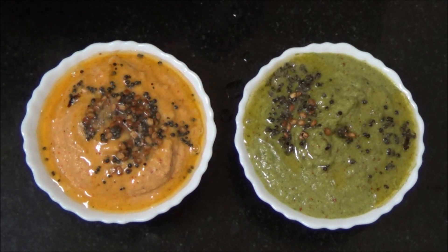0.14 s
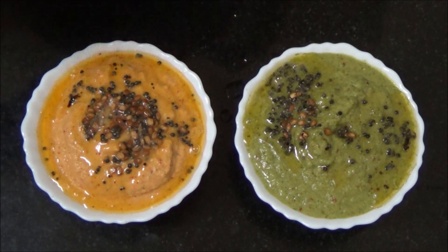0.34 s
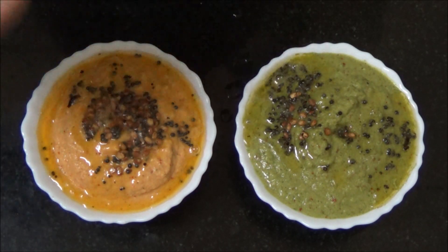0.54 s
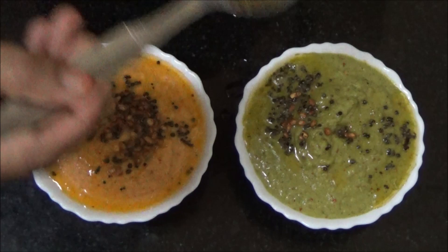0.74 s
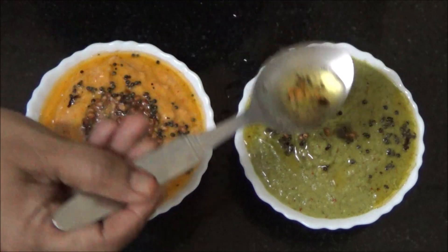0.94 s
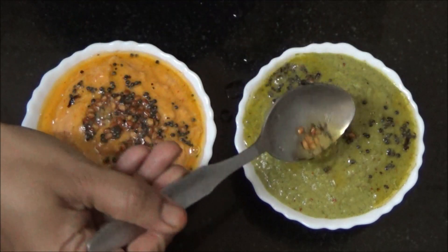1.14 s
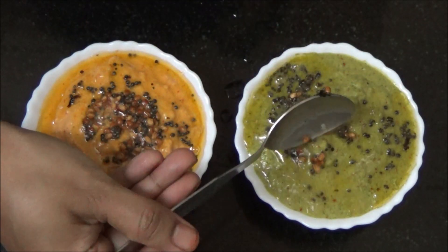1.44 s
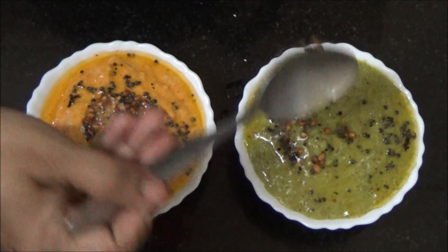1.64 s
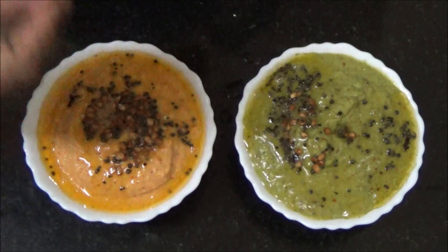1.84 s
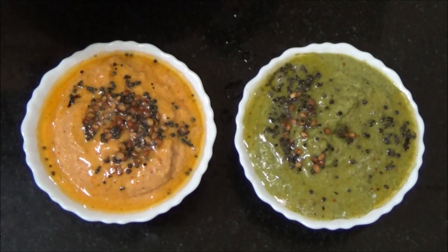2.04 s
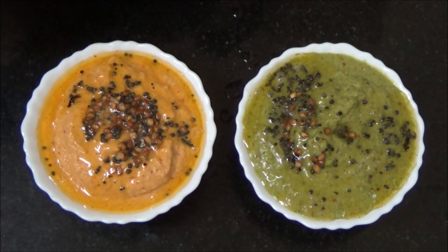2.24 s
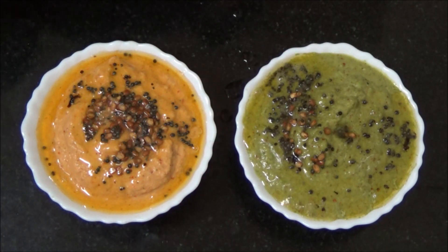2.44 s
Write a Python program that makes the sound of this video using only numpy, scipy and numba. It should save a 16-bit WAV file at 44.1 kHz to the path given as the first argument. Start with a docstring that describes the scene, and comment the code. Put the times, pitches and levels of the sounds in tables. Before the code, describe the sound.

Close up in a home kitchen, crisp high crackling of hot oil dies down, surges abruptly as more is poured, then thins to scattered spits and pops, with a faint scrape and knock at the end over low room hum.

```python
"""Hot oil with fried seeds crackles on wet food in two bowls, a camera just above the counter.
From the start, swarms of tiny damped sines sizzle over a shaped-noise kitchen hum, and steam bubbles
burst as ringing pops with a snap and a fizz; faint far sines waver behind. The sizzle thins, then a fresh
spoonful makes it swell near 1.3 s and thin out again. Late on come spitting runs of like-pitched grains,
a scrape of band-passed noise and dull knocks of decaying modes as something is set down."""
import sys
import numpy as np
from scipy import signal
from scipy.fft import rfft, irfft
from scipy.io import wavfile
from scipy.ndimage import uniform_filter1d, minimum_filter1d
from numba import njit

SR = 44100
rng = np.random.default_rng(int(sys.argv[2]) if len(sys.argv) > 2 else 0)


def wrap_up_sound(samples):
    """Save the sound to the file named by the first command line argument, as 16-bit audio."""
    columns = np.atleast_2d(samples).T
    # keep every value between -1 and 1, then stretch to whole-number steps
    tamed = np.clip(columns, -1, 1)
    steps = np.round(tamed * 32767).astype(np.int16)
    wavfile.write(sys.argv[1], SR, steps)


def gain_from_db(level_db):
    """Convert decibel levels to linear amplitude factors (20 dB per decade)."""
    decades = np.asarray(level_db, float) / 20
    return 10 ** decades


N = 114660


def curve(rows, col=1):
    """Linear interpolation of a table column over time."""
    rows = np.array(rows, float)
    return np.interp(np.arange(N) / SR, rows[:, 0], rows[:, col])


def at_hz(points, hz):
    """Spectral envelope in dB, interpolated on a logarithmic frequency axis."""
    points = np.array(points, float)
    return np.interp(np.log(np.maximum(hz, 1)), np.log(points[:, 0]), points[:, 1])


def unit(x):
    """Normalisation to rms 1."""
    return x / np.sqrt(np.mean(x ** 2))


def causal(points, size=1024):
    """Minimum-phase response of a spectrum by cepstral folding, peak 1."""
    cepstrum = irfft(at_hz(points, np.fft.rfftfreq(size, 1 / SR)) * np.log(10) / 20)
    cepstrum[1:size // 2] *= 2
    cepstrum[size // 2 + 1:] = 0
    response = irfft(np.exp(rfft(cepstrum)))
    return response / np.abs(response).max()


def conv(x, h):
    """Linear convolution along time."""
    return signal.fftconvolve(x, np.atleast_2d(h), axes=1)[:, :N]


@njit
def grains(start, hz, cycles, left, right, attack):
    """Damped oscillation: each grain is a sine that swells quickly and decays exponentially."""
    out = np.zeros((2, N))
    for k in range(len(start)):
        i = int(start[k])
        turn = np.exp((2j * np.pi - 1 / cycles[k] * np.pi) * hz[k] / SR)
        rise = np.exp(-np.pi * hz[k] / SR / min(attack, cycles[k]))
        # begin between samples
        ring, unrisen = turn ** (i + 1 - start[k]), rise ** (i + 1 - start[k])
        while abs(ring) > 2e-3 and 0 <= i < N - 1:
            i += 1
            out[0, i] += left[k] * ring.real * (1 - unrisen)
            out[1, i] += right[k] * ring.real * (1 - unrisen)
            ring *= turn
            unrisen *= rise
    return out


PAN_DB, PAN_SPREAD_DB = -0.5, 1.2  # left over right
ATTACK_CYCLES = 0.99


def place(s, hz, cycles, size, pan_db):
    """Interaural level difference: grains at times s, louder on one side."""
    columns = np.stack(np.broadcast_arrays(s, hz, cycles, size, pan_db))
    s, hz, cycles, size, pan_db = columns.reshape(5, -1)
    left, right = size * gain_from_db(pan_db / 2), size * gain_from_db(-pan_db / 2)
    return grains(s * SR, np.clip(hz, 200, .42 * SR), cycles, left, right, ATTACK_CYCLES)


# small crackle over time: time_s [s], level_db [dB, before GRAIN_DB], pitch_hz [Hz, typical bubble]
SIZZLE = [(0, -28.5, 7700), (.3, -32.5, 7600), (.62, -37.5, 7750), (.9, -39, 8400), (1.08, -38.5, 8500),
          (1.2, -41, 7640), (1.27, -21.5, 7400), (1.34, -18, 7460), (1.41, -16.5, 7000), (1.48, -22, 8300),
          (1.55, -22, 8300), (1.64, -22, 7000), (1.73, -25, 7900), (1.86, -28, 8100), (2.0, -28.5, 7340),
          (2.1, -30.5, 8150), (2.25, -30, 7340), (2.42, -32, 7400), (2.6, -31.5, 7800)]
GRAIN_DB, BOIL_DB, GRAIN_SPREAD_DB = -3, 2.07, 3
GRAIN_OCT, BOIL_OCT, GRAIN_CYCLES = 0.51, 0.11, 2.2


def crackle(count=18000):
    """Superposition of random bubble rings, many small and few large, with uneven level and pitch."""
    when, rank = rng.random((count, 2)).T
    pitch_chance, pan_chance, size_chance = rng.standard_normal((count, 3)).T
    i = (when * (N - 1)).astype(int)
    boil = uniform_filter1d(rng.standard_normal(N), size=300)
    boil = unit(uniform_filter1d(boil, size=300))
    size_db = BOIL_DB * boil[i] - GRAIN_SPREAD_DB * np.log(np.maximum(rank, .012))
    size = np.sign(size_chance) * gain_from_db(size_db)
    # the boil read backwards also sways the pitch
    octaves = GRAIN_OCT * pitch_chance + BOIL_OCT * boil[N - 1 - i]
    hz = curve(SIZZLE, 2)[i] * 2 ** octaves
    return place(when * N / SR, hz, GRAIN_CYCLES, size, PAN_DB + PAN_SPREAD_DB * pan_chance)


# hum spectrum: frequency_hz [Hz], density_db [dB per Hz, relative]
HUM = [(20, -36), (40, -23), (62, -11), (85, -21), (155, -9), (210, -12.5), (270, -8.5), (520, -4),
       (1140, -5), (3200, -8), (6000, -25.5), (16000, -28.5)]
# hum level at 300-1500 Hz: time_s [s], level_db [dB, before HUM_DB]
HUM_LEVEL = [(0, -48), (.85, -53.5), (1.4, -51), (1.85, -53), (2.6, -52)]
# stereo width of the hum: frequency_hz [Hz], side_db [dB, weight of the side noise]
HUM_SIDE = [(60, -21), (200, -20), (700, -9), (1300, -5), (4000, -28.5)]
HUM_DB = 1.5


def hum():
    """Spectral shaping of noise: kitchen, street and microphone hiss, nearly alike left and right."""
    hz = np.fft.rfftfreq(N, 1 / SR)
    mid, side = rfft(rng.standard_normal((2, N))) * gain_from_db(at_hz(HUM, hz))
    band = (hz > 300) & (hz < 1500)
    gain = gain_from_db(curve(HUM_LEVEL) + HUM_DB) / np.std(irfft(mid * band, N))
    side = side * gain_from_db(at_hz(HUM_SIDE, hz))
    return gain * irfft(mid + side * np.array([[1], [-1]]), N)


# loud pops: time_s [s, sound starts POP_LEAD_S earlier], level_db [dB, before POP_DB],
# pitch_hz [Hz, bubble ring], snap_db [dB relative to the ring, before SNAP_DB]
POPS = [(0.023, -9, 11400, -20.0), (0.0296, -12, 9700, -36), (0.0332, -10.5, 9500, -30),
        (0.0429, -14, 8200, -11), (0.0744, -17, 5700, -11.0), (0.0843, -11, 9000, -15),
        (0.1018, -18, 4730, -9), (0.1373, -20, 5600, 3.5), (0.1405, -17.5, 8600, 3.5),
        (0.144, -10.5, 8400, -7), (0.159, -9.5, 7100, -10), (0.1628, -12, 8700, -14),
        (0.1873, -14, 7700, -8.5), (0.207, -10, 9600, -22), (0.2237, -6, 7150, -13.5),
        (0.2365, -11.5, 8800, -5.5), (0.246, -9, 9200, -13), (0.307, -16.5, 9400, -7),
        (0.337, -24, 9400, -24), (0.3497, -15.5, 4400, -4.5), (0.3552, -18, 7500, -4),
        (0.3563, -3.5, 6700, -32), (0.3884, -1.5, 8700, -36), (0.3959, -10, 10400, -24),
        (0.399, -15.5, 8000, -14), (0.4193, -25, 4770, 8), (0.4375, -19, 7700, -21.0),
        (0.4582, -18, 4800, -3.5), (0.4634, -14, 8500, -17.0), (0.4764, -7.5, 11000, -33),
        (0.4837, -3, 10300, -32), (0.5073, -18, 9400, -27.0), (0.5157, -3, 7950, -36),
        (0.5309, -16.0, 10600, -25.0), (0.5608, -3.0, 8800, -13), (0.5644, -15.5, 7600, -5),
        (0.5784, -4.5, 12600, -36), (0.6104, -18, 7640, -5), (0.6435, -15.0, 4700, -11.0),
        (0.6563, -5.5, 6950, -35), (0.6648, -12.5, 6600, -6), (0.6886, -10, 7240, -3.5),
        (0.7348, -19, 7540, -8), (0.7387, -7.5, 7240, -10.5), (0.763, -9.5, 8360, -23),
        (0.8178, -6, 6400, -30), (0.8232, -10, 8600, -14), (0.8513, -18, 9700, -30),
        (0.8734, -24, 7460, -21), (0.8845, -11, 7200, -20.5), (0.9317, -13.0, 6300, -11),
        (0.9436, -4, 9400, -15), (0.9764, -18.0, 8300, -4), (0.9829, -8.5, 6760, -28),
        (1.0103, -10, 6000, -25), (1.0233, -9.5, 4700, -28), (1.0964, -11, 4640, -26),
        (1.1025, -10, 10800, -22), (1.1365, -10.5, 10600, -30), (1.1657, -17.5, 6740, -8.5),
        (1.202, -23.5, 4900, -4), (1.2221, -18.5, 6700, -1), (1.2445, -24, 5600, 5),
        (1.2684, 1.5, 9800, -17.0), (1.2983, -2.5, 6600, -16), (1.309, 1, 8350, -25),
        (1.3446, -2, 7300, -14), (1.3493, -2.5, 7940, -24), (1.393, 0, 7950, -8), (1.4057, 2, 5300, -19),
        (1.4272, -2, 8200, -16), (1.4512, -17, 9200, -24), (1.4675, 5, 10200, -30),
        (1.4758, -10, 8700, -9.5), (1.4828, 3, 9000, -24), (1.5058, 3, 9500, -15),
        (1.5129, -11, 6300, -6.5), (1.5331, -2.5, 9900, -33), (1.578, -3, 10200, -29),
        (1.5821, 4, 10000, -36), (1.6018, -10, 9300, -10), (1.6062, -4.5, 6040, -17),
        (1.6141, 0, 9900, -26), (1.629, -4.0, 5700, -14), (1.635, 7, 7900, -32), (1.6398, -9, 8400, -23.0),
        (1.6417, -13, 7500, -26), (1.653, 2, 6600, -35), (1.6612, -5, 6960, -28), (1.7066, -8, 8900, -35),
        (1.7144, -1, 6300, -16), (1.7405, -7, 7660, -25), (1.7463, -3, 8500, -32), (1.75, 3, 9200, -37),
        (1.7626, -11, 9900, -36), (1.777, -3, 9600, -31), (1.8002, -6, 9200, -33),
        (1.8114, -7.0, 6960, -32), (1.8267, -4, 10300, -15), (1.8448, -6.5, 6160, -23),
        (1.8775, -15, 7000, -26.0), (1.8827, -1.5, 8600, -31), (1.9381, -7.5, 8650, -13),
        (1.9488, -4, 7600, -16), (1.9802, -2.0, 6800, -27.0), (2.003, -7.5, 8400, -26),
        (2.02, -7.5, 7900, -22.0), (2.0312, -16, 7300, -29), (2.052, -11.5, 8400, -7),
        (2.0665, -9, 9000, -8.5), (2.0777, 3, 6400, -24), (2.0903, -8, 9400, -45), (2.097, -2, 8500, -28),
        (2.1249, -13, 7600, -19), (2.1316, -5, 8000, -29), (2.141, -7.5, 8300, -24),
        (2.1607, -2.5, 9000, -16), (2.1744, 5.5, 7660, -23), (2.2164, -2.5, 7100, -32),
        (2.2315, -3, 6850, -30), (2.265, -12.5, 7700, -11), (2.3219, -3.5, 7400, -23.0),
        (2.3493, -13.5, 7050, -10), (2.387, -11.0, 10900, -30), (2.3986, -4.5, 6800, -10),
        (2.4546, -13, 7700, -29), (2.4706, -10, 5700, -18), (2.4796, -8.0, 8400, -13),
        (2.4872, 5, 8300, -48), (2.5297, -10.5, 7100, -14), (2.5557, -8, 8600, -28),
        (2.5955, -10.5, 9200, -38)]
POP_DB, POP_LEAD_S, POP_CYCLES = -2.5, .0003, 3.1
SNAP_DB, SNAP_CYCLES, SNAP_HZ = 25.5, 0.54, 3740
FIZZ_DB, FIZZ_T60_S, FIZZ_OCT, FIZZ_CYCLES = -12, 0.025, 0.32, 4
FIZZ_GAP_S = .006  # scales a squared exponential draw


def pops(count=36):
    """Bubble resonance: a short ring and a broad snap per burst, then a decaying fizz of droplets."""
    s, db, hz, snap_db = np.array(POPS, float).T
    s, size = s - POP_LEAD_S, gain_from_db(db + POP_DB)
    pan_db = PAN_DB + PAN_SPREAD_DB * rng.standard_normal(len(s))
    ring = place(s, hz, POP_CYCLES, size, pan_db)
    snap = place(s, SNAP_HZ, SNAP_CYCLES, size * gain_from_db(snap_db + SNAP_DB), pan_db)
    after = FIZZ_GAP_S * rng.exponential(1, (count, len(s))) ** 2
    size_chance, pitch_chance = rng.standard_normal((2, count, len(s)))
    drops = size * size_chance * gain_from_db(FIZZ_DB - 60 * after / FIZZ_T60_S)
    fizz = place(s + after, hz * 2 ** (FIZZ_OCT * pitch_chance), FIZZ_CYCLES, drops, pan_db)
    return ring + snap + fizz


# faint far tones: start_s [s], length_s [s], from_hz [Hz], to_hz [Hz], level_db [dB, mean amplitude]
TONES = [(.15, .58, 1285, 1400, -57), (.8, .42, 515, 540, -60), (1.48, .3, 480, 478, -57)]
TONE_WIDTH_HZ = 30  # sets the averaging time of the waver


def tones():
    """Amplitude and phase modulation: thin gliding sines from far outside, wavering at random."""
    t, out = np.arange(N) / SR, 0
    for s, length, hz0, hz1, db in TONES:
        waver = unit(uniform_filter1d(rng.standard_normal(N), int(SR / TONE_WIDTH_HZ)))
        fade = np.clip(np.minimum(t - s, s + length - t) / 0.017, 0, 1)
        phase = 2 * np.pi * np.cumsum(np.interp(t, [s, s + length], [hz0, hz1])) / SR
        out = out + gain_from_db(db) * fade * (1 + 0.46 * waver) * np.sin(phase + waver / 2)
    return out


# wet seeds spitting steam: start_s [s], t60_s [s], pitch_hz [Hz], level_db [dB, typical first grain]
SPURTS = [(1.981, 0.15, 6600, -24.5), (2.231, 0.42, 7200, -24), (2.337, 0.045, 5950, -31.5)]
SPURT_OCT, SPURT_CYCLES = 0.061, 18.0


def spurts(count=150):
    """Exponential decay of a bubble train: a wet seed keeps spitting steam near one pitch."""
    out = 0
    for s, t60, hz, db in SPURTS:
        after = rng.random(count) * t60 / 2
        pitch_chance, size_chance = rng.standard_normal((count, 2)).T
        size = size_chance * gain_from_db(db - 60 * after / t60)
        out = out + place(s + after, hz * 2 ** (SPURT_OCT * pitch_chance), SPURT_CYCLES, size, PAN_DB)
    return out


# something slides on the counter: time_s [s], level_db [dB rms]
SCRAPE = [(2.2, -64), (2.28, -49.5), (2.32, -54), (2.37, -45.5), (2.44, -52), (2.5, -55), (2.54, -37),
          (2.6, -49.5)]
SCRAPE_HZ, SCRAPE_WIDTH_HZ = 808, 520


def scrape():
    """Friction noise: a band of random noise follows the sliding level."""
    edges = [SCRAPE_HZ - SCRAPE_WIDTH_HZ / 2, SCRAPE_HZ + SCRAPE_WIDTH_HZ / 2]
    band = signal.butter(4, edges, "band", fs=SR, output="sos")
    noise = unit(signal.sosfilt(band, rng.standard_normal(N)))
    fade_in = np.clip((np.arange(N) / SR - SCRAPE[0][0]) / 0.084, 0, 1)
    return noise * gain_from_db(curve(SCRAPE)) * fade_in


# knocks: start_s [s], level_db [dB, relative]
KNOCKS = [(2.511, -24.5), (2.547, -37)]
# modes of the knocked object: pitch_hz [Hz], level_db [dB, relative], t60_s [s]
KNOCK_MODES = [(590, -10, .12), (716, -30, .1), (844, 5, 0.073), (1016, 15.5, 0.02), (1310, -4, 0.055),
               (1620, 10.5, 0.022)]


def knocks():
    """Modal synthesis: each blow excites the object's decaying modes."""
    t, out = np.arange(N) / SR, np.zeros(N)
    for s, db in KNOCKS:
        i = int(s * SR)
        since = t[i:] - s
        onset = np.clip(since / 0.0011, 0, 1)
        for hz, mode_db, t60 in KNOCK_MODES:
            decay = gain_from_db(db + mode_db - 60 * since / t60)
            out[i:] += 0.29 * decay * np.sin(2 * np.pi * hz * since) * onset
    return out


ROOM_DB, ROOM_T60_S, ROOM_LATE_S = -10, .14, .004  # the tail builds up over ROOM_LATE_S
ROOM_WIDE, ROOM_TOP_HZ = .6, 9000


def room_tail():
    """Diffuse reverberation: low-passed, decaying noise, partly different left and right."""
    t = np.arange(int(.4 * SR)) / SR
    lowpass = signal.butter(2, ROOM_TOP_HZ, fs=SR)
    mid, side = signal.lfilter(*lowpass, rng.standard_normal((2, len(t))))
    stereo = mid + ROOM_WIDE * side * np.array([[1], [-1]])
    h = stereo * gain_from_db(-60 * t / ROOM_T60_S) * np.clip(t / ROOM_LATE_S, 0, 1) ** 2
    return gain_from_db(ROOM_DB) * h / np.sqrt(np.sum(h ** 2) / 2)


# colour of a burst at the microphone: frequency_hz [Hz], level_db [dB, relative]
BURST = [(500, -58), (1000, -39), (1800, -12.5), (3000, -11.5), (5000, -9), (7500, -6), (9700, 0),
         (11500, -6), (13000, -10.5), (15800, -11), (16400, -76)]
# bounces off bowl and counter: delay_s [s], level_db [dB relative to the direct sound]
BOUNCES = [(.0012, -11)]


def oil():
    """Linear filtering: crackle, pops and spurts take the burst colour, bounce and fill the kitchen."""
    space = room_tail()
    space[:, 0] += 1  # direct sound
    for s, db in BOUNCES:
        space[:, int(s * SR)] += gain_from_db(db)
    colour = causal(BURST)
    small = unit(conv(crackle(), colour)) * gain_from_db(curve(SIZZLE) + GRAIN_DB)
    bursts = conv(pops() + spurts(), colour)
    return conv(small + bursts, space)


def scene():
    """Superposition of all sources at the two microphone ports."""
    return oil() + hum() + tones() + scrape() + knocks()


def band_limit(x):
    """A steep low-pass at the top of the band."""
    return signal.sosfilt(signal.butter(12, 16820, fs=SR, output="sos"), x)


CEILING, LIMIT_S = 1, 0.0022


def record(dry):
    """Peak limiting: the camera's smoothed gain holds the tallest peaks down."""
    size = int(LIMIT_S * SR)
    peak = np.abs(dry).max(axis=0) + 1e-9
    lowest = minimum_filter1d(np.minimum(1, CEILING / peak), 2 * size + 1)
    mix = dry * uniform_filter1d(lowest, size)
    return band_limit(mix)


dry = scene()
out = record(dry)
wrap_up_sound(out)
```